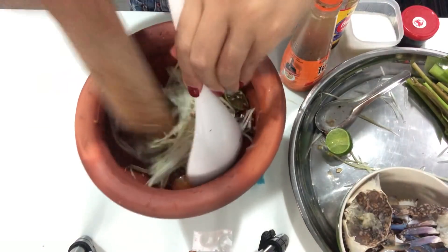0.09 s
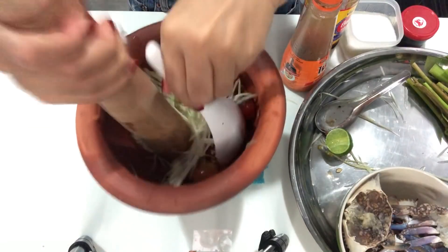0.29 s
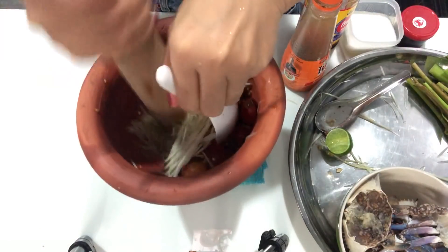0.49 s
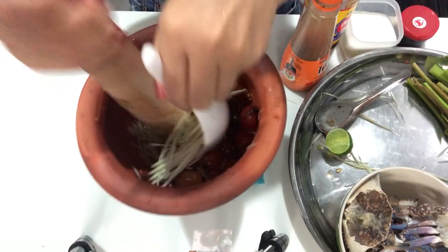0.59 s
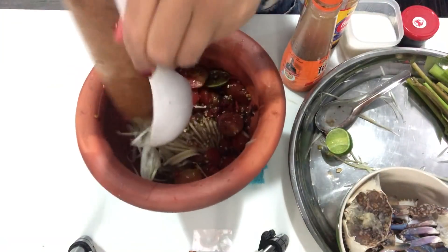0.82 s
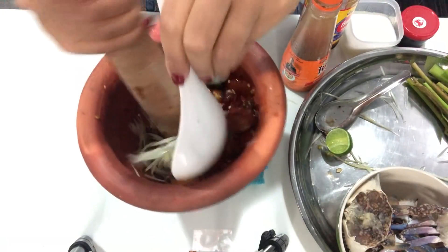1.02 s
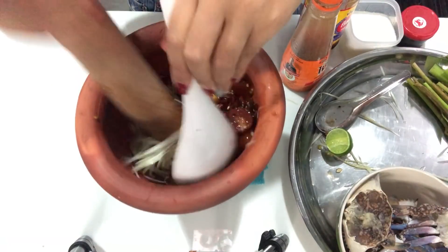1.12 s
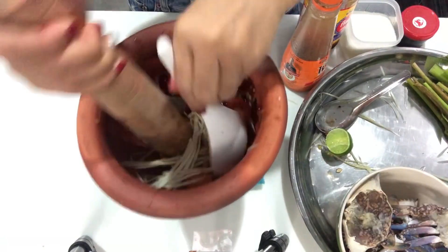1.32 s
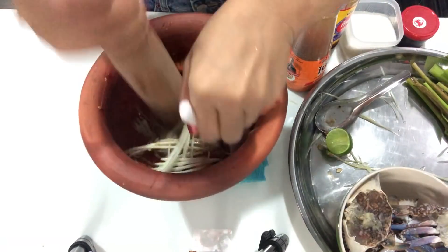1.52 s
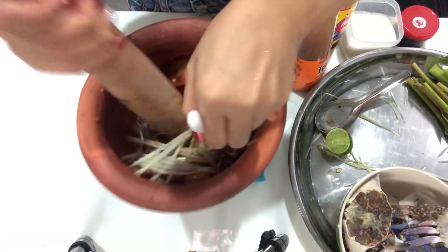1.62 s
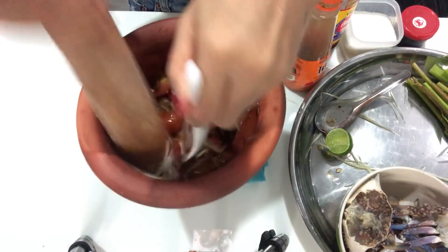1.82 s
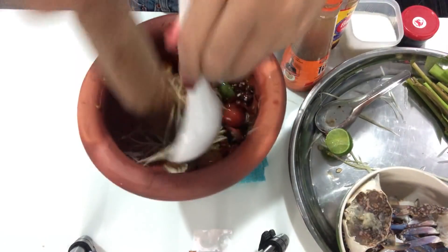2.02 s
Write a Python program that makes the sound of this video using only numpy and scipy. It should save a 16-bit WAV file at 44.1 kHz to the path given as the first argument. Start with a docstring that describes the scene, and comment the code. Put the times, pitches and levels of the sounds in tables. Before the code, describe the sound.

A wooden pestle pounds wet shreds in a clay mortar, heard closely. Crunch at 0 s, light knock at 0.1, loudest hollow clonk at 0.23, quickly damped, snappy crunch at 0.33, soft squash at 0.6, ringing knock at 0.8. Crunchy blow with low table thud at 1.06, spoon ticks at 1.2, gritty scrape around 1.35, crunch at 1.64, knocks at 1.83 and 1.95, the last with a spoon clink. Faint rustle, quiet room hum.

```python
"""A wooden pestle pounds wet shredded vegetable in a clay mortar and knocks its wall: decaying sines ring
until the pestle damps them. Noise and tiny grains make the crunch and rustle; noise puffs are snapping shreds.
A spoon taps and scrapes the clay through its own resonances, and one heavy blow thuds through the table.
A close microphone hears all this with a faint echo, in a quiet kitchen of filtered noise and a low hum."""
import sys
import numpy as np
from scipy import signal
from scipy.fft import rfft, irfft, next_fast_len
from scipy.io import wavfile

SR = 44100
rng = np.random.default_rng(int(sys.argv[2]) if len(sys.argv) > 2 else 0)


def store_wav(level_fs):
    """Save 16-bit WAV to argv[1]."""
    pcm = np.round(np.clip(np.atleast_2d(level_fs), -1, 1) * 32767)
    wavfile.write(sys.argv[1], SR, pcm.T.astype(np.int16))


def ratio_of_db(decibels):
    """Turn decibels (scalar or array-like) into linear amplitude factors; 0 dB maps to 1."""
    return 10 ** (np.asarray(decibels, float) / 20)


N = 92610  # samples, 2.1 s
T = np.arange(N) / SR


def unit(x):
    """Scales a signal to rms 1."""
    return x / np.sqrt(np.mean(x ** 2) + 1e-20)


def along(points, hz):
    """Reads a curve of (Hz, value) points on a log frequency axis."""
    f, v = np.transpose(points)
    return np.interp(np.log(hz + 1), np.log(f + 1), v)


def curve(rows):
    """Draws straight lines between (s, value) rows, one value per sample."""
    return np.interp(T, *np.transpose(rows))


def filtered(x, response):
    """Filters x by a complex response, given as a function of frequency in Hz."""
    size = next_fast_len(N + 8192)
    return irfft(rfft(x, size) * response(np.fft.rfftfreq(size, 1 / SR)), size)[:N]


def resonances(modes, f):
    """Sums the responses of (Hz, width Hz, dB) resonances, every second one inverted."""
    total = 0
    for k, (centre, width, db) in enumerate(modes):
        damping = 1j * f * width
        total = total + (-1) ** k * ratio_of_db(db) * damping / (centre * centre - f * f + damping)
    return total


def mortar():
    """Each knock cracks and rings decaying modes, which the pestle then damps as it presses down."""
    # The mortar's modes. Each row: family, pitch in Hz, level within the family in dB, t60 in seconds.
    modes = [("clack", 1270, 0, 0.01), ("clack", 1620, -2.5, 0.021), ("clack", 2100, -3, 0.015),
             ("clack", 835, -7.5, 0.013), ("wood", 946, 0, 0.048), ("quick", 1099, 0, 0.14),
             ("quick", 1165, -11, 0.19), ("lasting", 1088, 0, 0.75), ("upper", 2796, 0, 0.068),
             ("upper", 2817, -13, 0.28), ("hollow", 550, -3, 0.12), ("hollow", 590, 0, 0.035),
             ("hollow", 505, -10.5, 0.096), ("hollow", 408, -13.5, 0.18), ("hollow", 350, -19, 0.15)]
    # The families, in the order of the last six columns of the knocks.
    families = ["clack", "wood", "quick", "lasting", "upper", "hollow"]
    # Knocks on the wall. Each row: start in seconds, crack level in dB, then the level of each family in dB.
    knocks = [(.001, -60, -70, -70, -64, -46, -74, -65), (0.1153, -17.5, -23, -30.5, -44, -32, -54, -28),
              (.2330, -4.5, -3.5, -14.5, -21, -7.5, -11.5, -15),
              (0.3035, -18.5, -16.5, -34, -23, -43, -54, -19),
              (.346, -38.5, -38, -42, -44.5, -34, -57, -25), (.435, -74, -70, -70, -70.5, -44, -73, -62),
              (0.7996, -19.5, -20, -30, -16, -25, -24.5, -25.5),
              (1.075, -50, -38, -49, -57.5, -58, -60, -35.5), (1.22, -51, -58, -50, -45.5, -51, -59, -45),
              (1.256, -48.5, -47, -47, -40, -61, -66, -37), (1.2709, -27, -27, -29.5, -26.5, -32, -42, -28),
              (1.628, -55, -45, -45, -56.5, -58, -65.5, -38.5), (1.65, -56, -45, -50, -60, -61, -65, -42),
              (1.8301, -15.5, -17.5, -10, -16.5, -24.5, -24.5, -22.5),
              (1.882, -48, -44, -46, -38, -25, -60, -41), (1.953, -8.5, -19, -28, -30.5, -36, -34, -37)]
    # The pestle presses down. Each row: middle of the press in seconds, loss in dB.
    presses = [(.2, 2), (0.306, 4), (0.324, 9.5), (.376, 12.5), (.425, 11), (.52, 7), (1.058, 10),
               (1.325, 9), (1.871, 7.5), (1.951, 3.5), (2.06, 7)]
    # Colour of the crack, applied twice. Each row: centre in Hz, width in Hz, level in dB.
    crack_colour = [(1320, 2200, 0.5)]
    rise_s, press_s = 0.00072, 0.0032
    crack_t60, rumble_t60 = 0.014, 0.18  # s
    rumble_db = -25.5  # dense small modes after the crack, against its level

    loss = np.zeros(N)  # dB, adding up over the presses
    for s, db in presses:
        loss += db / (1 + np.exp(-np.clip((T - s) / press_s, -50, 50)))

    rings, cracks = np.zeros(N), np.zeros(N)
    for s, crack_db, *levels in knocks:
        i = int(np.ceil(s * SR))
        t = T[i:i + SR // 2] - s
        span = slice(i, i + len(t))
        family_db = dict(zip(families, levels))
        ring = np.zeros(len(t))
        for family, hz, db, t60 in modes:
            # clack and wood start against the others, so that the ring swells first
            sign = -1 if family in ("clack", "wood") else 1
            ring += sign * ratio_of_db(family_db[family] + db - 60 * t / t60) * np.sin(2 * np.pi * hz * t)
        # a knock loses only what is added later than 300 samples after it
        damped = ratio_of_db(loss[i + 300] - np.maximum(loss[span], loss[i + 300]))
        rings[span] += ring * (1 - np.exp(-t / rise_s)) * damped

        crack = ratio_of_db(crack_db - 60 * t / crack_t60)
        rumble = ratio_of_db(crack_db + rumble_db - 60 * t / rumble_t60)
        cracks[span] += (crack + rumble) * rng.standard_normal(len(t))
    return rings + filtered(cracks, lambda f: resonances(crack_colour, f) ** 2)


def grit():
    """Mixes plain noise with short grains, sines that swell and die, of scattered pitch and size."""
    grains_per_s, spread_db = 3500, 5
    middle_hz, spread_octaves = 3516, 1.308
    cycles = 2.36  # the decay takes 20 dB in this many
    wet_share = 0.35  # plain noise in the power
    count = grains_per_s * N // SR
    start = (rng.random(count) * N).astype(int)[:, None]
    hz = np.clip(middle_hz * 2 ** (spread_octaves * rng.standard_normal(count)), 500, 16000)[:, None]
    size = ratio_of_db(spread_db * rng.exponential(1, count).clip(0, 3))[:, None]
    k = np.arange(200)
    turns = hz * k / SR
    envelope = turns * ratio_of_db(-20 * turns / cycles)
    waves = size * np.sqrt(hz) * np.sin(2 * np.pi * turns) * envelope
    grains = np.bincount((start + k).ravel(), waves.ravel(), minlength=N)[:N]
    return np.sqrt(wet_share) * rng.standard_normal(N) + np.sqrt(1 - wet_share) * unit(grains)


def shreds():
    """Blows swell and fade as crunching grit over a rustle, coloured by the bowl; the treble has its own level."""
    # Blows into the shreds. Each row: time in seconds, level in dB (the rounded top stays 3 dB under it),
    # rise in seconds per 20 dB (sign ignored), fall in seconds per 20 dB, extra treble in dB.
    pounds = [(.0155, -37, -0.7, 0.0648, 6), (.0435, -28.5, -0.05, 0.048, -3.5),
              (.1665, -46.5, 0.16, 0.2, 3), (.3365, -29.5, 0.03, 0.06, 2), (.569, -39.5, 0.11, .032, 3.5),
              (.592, -34, 0.07, 0.0227, 4), (.6205, -36, 0.08, .023, -10), (1.0585, -30, 0.0231, .018, 4),
              (1.081, -28.5, 0.0232, 0.0468, 1), (1.186, -42, 0.06, 0.12, -5.5),
              (1.241, -56.5, 0.1, 0.4, 10.5), (1.371, -28, .032, 0.0254, -2.5),
              (1.461, -53.5, 0.08, 0.34, 9), (1.631, -32.5, 0.05, 0.0158, 3),
              (1.651, -34, 0.0243, .042, 2.5), (1.746, -42.5, 0.05, 0.02, -6),
              (1.941, -37.5, .026, 0.05, 10), (1.977, -31.5, .045, 0.04, 2)]
    # Plain colour of the crunch. Each row: frequency in Hz, relative level in dB per Hz.
    crunch = [(88, -52.5), (150, -11), (422, -34), (624, -1), (905, -5.5), (1830, -4), (2270, -5),
              (6020, -8.5), (15100, -22.5), (16000, -37)]
    # Resonances of the bowl. Each row: centre in Hz, width in Hz, level in dB against the plain crunch.
    bowl = [(618, 68, -1.5), (1180, 40, -15), (1900, 200, -8.5)]
    # Shreds shifting. Each row: time in seconds, level in dB.
    rustle = [(0, -49.5), (.09, -60), (.21, -64.5), (.27, -55), (.4, -51), (.46, -59.5), (.52, -65),
              (.55, -56), (.66, -56.5), (.78, -59), (.84, -64), (1.01, -74), (1.12, -59), (1.15, -68.5),
              (1.23, -61), (1.31, -72), (1.45, -49), (1.58, -58), (1.69, -90), (1.72, -53.5), (1.8, -54),
              (1.86, -55), (1.91, -62.5), (2.03, -54), (2.1, -52)]
    treble_hz = 5000

    grains = unit(filtered(grit(), lambda f: ratio_of_db(along(crunch, f)) * (1 + resonances(bowl, f))))
    high = filtered(grains, lambda f: 1 / (1 + (treble_hz / (f + 1)) ** 4))
    body_power = ratio_of_db(2 * curve(rustle))
    treble_power = body_power.copy()
    for s, db, rise, fall, treble_db in pounds:
        away = np.where(T < s, (s - T) / rise, (T - s) / fall)
        power = ratio_of_db(2 * (db - 20 * np.hypot(away, 0.15)))
        body_power += power
        treble_power += power * ratio_of_db(2 * treble_db)
    return np.sqrt(body_power) * (grains - high) + np.sqrt(treble_power) * high


def snaps():
    """Single shreds snap as short noise puffs, each filtered around its own pitch."""
    # Each row: time in seconds, peak level in dB, pitch in Hz, length in seconds (noise is fullest at a third).
    snap_rows = [(0.018, -27, 10500, .003), (.039, -24, 1996, 0.0053), (0.0456, -25.5, 3230, 0.0044),
                 (.048, -17.5, 1900, 0.0013), (.168, -38, 2540, 0.0021), (0.207, -48, 4500, 0.0026),
                 (.3288, -20, 5340, 0.0017), (0.339, -16, 2730, .003), (0.567, -29.5, 3600, 0.0059),
                 (.58, -31, 1900, .003), (0.693, -35.5, 3600, 0.0047), (.945, -48.5, 6000, 0.0049),
                 (1.039, -38, 9040, .002), (1.0585, -17, 4540, 0.0027), (1.1594, -41.5, 5500, .001),
                 (1.172, -43, 5000, .0015), (1.172, -39, 1780, 0.0027), (1.282, -36, 9050, 0.0041),
                 (1.347, -28, 10880, .002), (1.649, -29, 2560, 0.0017), (1.691, -43.5, 5960, .004),
                 (1.756, -33.5, 3550, 0.0048), (1.935, -44, 7000, 0.0021), (2.051, -39.5, 7070, .002)]
    relative_width = 0.73  # band width over pitch
    size = 1024
    out, t = np.zeros(N + size), np.arange(size) / SR
    f = np.fft.rfftfreq(size, 1 / SR)
    for s, db, hz, length in snap_rows:
        noise = rng.standard_normal(size) * t / length * np.exp(-3 * t / length)
        puff = irfft(rfft(noise) * resonances([(hz, hz * relative_width, 0)], f) ** 2)
        start = round(s * SR) - 30  # the puff starts slightly ahead of its time
        out[start:start + size] += ratio_of_db(db) * puff / np.abs(puff).max()
    return out[:N]


def spoon():
    """Taps ring the spoon's modes as decaying sines; a scrape drives the same modes with grit."""
    # The spoon's modes. Each row: pitch in Hz, width in Hz, level in dB.
    modes = [(2770, 84, 0), (3890, 230, 5), (5796, 79, -1), (6120, 110, -3.5), (7600, 160, -8),
             (8620, 120, -2.5), (10170, 170, -9.5), (10560, 200, -3.5), (11850, 250, -8), (13600, 370, -7),
             (15300, 370, -16)]
    # Hiss of the scrape. Each row: frequency in Hz, level in dB against the modes.
    hiss = [(500, -21), (2500, -8), (5000, -4.5), (10000, -11), (16000, -16)]
    # Spoon taps. Each row: start in seconds, level in dB, favoured pitch in Hz.
    taps = [(1.2017, -25, 9900), (1.222, -39, 9000), (1.238, -47, 8000), (1.245, -44, 5800),
            (1.256, -39, 6500), (1.273, -39, 5800), (1.9535, -23.5, 6100)]
    # Spoon dragged along the clay. Each row: time in seconds, level in dB.
    scrape = [(1.318, -78), (1.328, -32.5), (1.345, -34.5), (1.375, -33.5), (1.39, -40.5), (1.41, -32.5),
              (1.43, -43), (1.5, -50), (1.56, -56), (1.6, -90)]
    rise_s, fade_db_per_octave, scatter_db = 0.00031, 18, 3

    rough = unit(filtered(grit(), lambda f: resonances(modes, f) + ratio_of_db(along(hiss, f))))
    out = ratio_of_db(curve(scrape)) * (T > scrape[0][0]) * rough
    t = np.arange(2000) / SR
    for s, db, best_hz in taps:
        ring = np.zeros(len(t))
        for hz, width, mode_db in modes:
            # modes far from the favoured pitch are weaker
            off_db = fade_db_per_octave * abs(np.log2(hz / best_hz))
            level = ratio_of_db(db + mode_db - off_db + scatter_db * rng.normal())
            ring += level * np.exp(-np.pi * width * t) * np.sin(2 * np.pi * hz * t)
        start = round(s * SR)
        out[start:start + len(t)] += ring * (1 - np.exp(-t / rise_s))
    return out


def thud():
    """The table takes one heavy blow: a low sine that dies quickly."""
    start_s, level_db, hz, t60 = 1.062, -34.5, 119, 0.037
    t = np.maximum(T - start_s, 0)
    return ratio_of_db(level_db - 60 * t / t60) * np.sin(2 * np.pi * hz * t)


def room(x):
    """The walls answer with noise in which each frequency dies at its own speed."""
    # Each row: frequency in Hz, t60 in seconds.
    wall_t60 = [(300, 0.56), (2000, 0.15), (10000, 0.078)]
    hz, t, z = signal.stft(rng.standard_normal(SR // 2), SR, nperseg=256)
    decay = ratio_of_db(-60 * t / along(wall_t60, hz)[:, None])
    tail = signal.istft(z * decay, SR, nperseg=256)[1]
    delayed = np.pad(x, (250, 0))  # samples before the walls answer
    return signal.fftconvolve(delayed, tail / np.linalg.norm(tail))[:N]


def kitchen():
    """Steady filtered noise is the room's air; noise in a 6 Hz wide band makes a wavering hum."""
    # Colour of the air. Each row: frequency in Hz, relative level in dB per Hz.
    air_colour = [(25, -24), (45, -2.5), (65, 1.5), (150, -3.5), (400, -7.5), (600, -12), (1000, -10.5),
                  (2400, -26), (7700, -32), (12000, -34), (16000, -40.5)]
    air_db, hum_db, hum_hz = -58, -66.5, 142.5  # levels are rms
    air = unit(filtered(rng.standard_normal(N), lambda f: ratio_of_db(along(air_colour, f))))
    hum = unit(filtered(rng.standard_normal(N), lambda f: resonances([(hum_hz, 6, 0)], f)))
    return ratio_of_db(air_db) * air + ratio_of_db(hum_db) * hum


def scene():
    """Adds all sources near the microphone, their echo and the kitchen behind them, as one channel."""
    near = mortar() + shreds() + snaps() + spoon() + thud()
    echo_db = -18.5
    return (near + ratio_of_db(echo_db) * room(near) + kitchen())[None]


def low_pass(x):
    """Removes everything above the highest recorded frequency."""
    return signal.sosfilt(signal.butter(12, 16500, fs=SR, output="sos"), x)


def record(dry):
    """The recorder clips at full scale, cuts the bass and stops sharply at the top of its band."""
    bass_hz, top_hz = 45, 16250

    def response(f):
        bass_cut = (1j * f / bass_hz / (1 + 1j * f / bass_hz)) ** 2
        return (f < top_hz) * bass_cut

    heard = filtered(np.clip(dry[0], -1, 1), response)
    return low_pass(heard[None])


dry = scene()
out = record(dry)
store_wav(out)
```